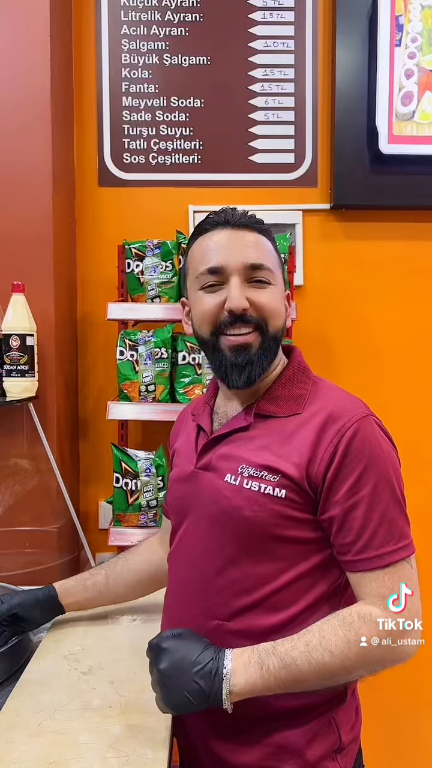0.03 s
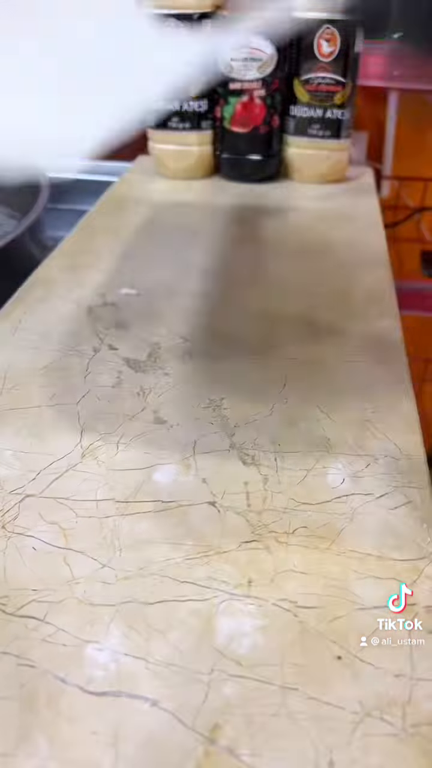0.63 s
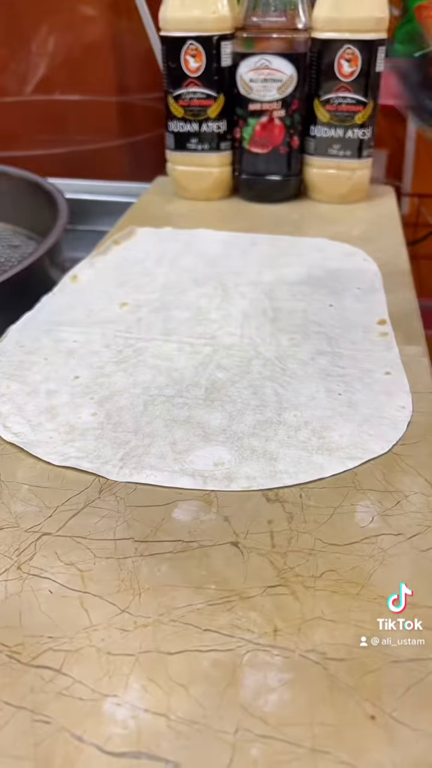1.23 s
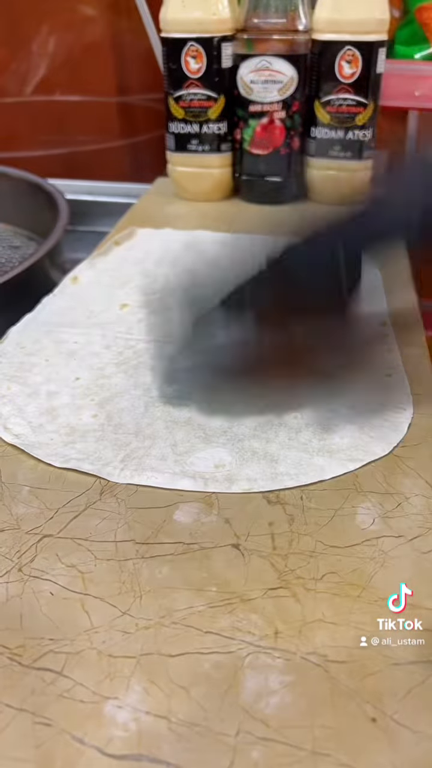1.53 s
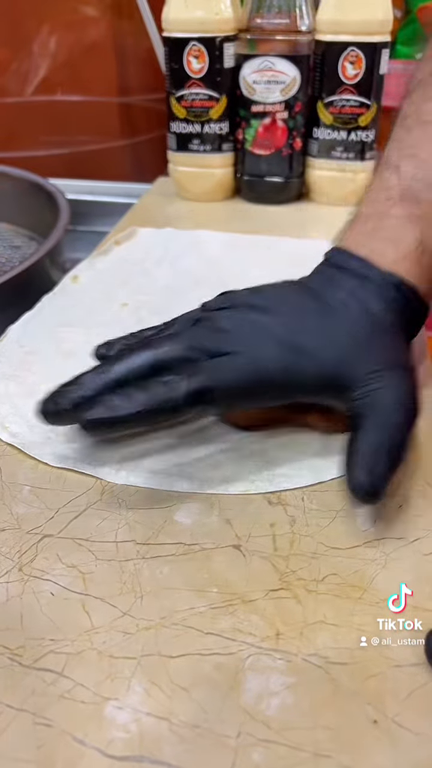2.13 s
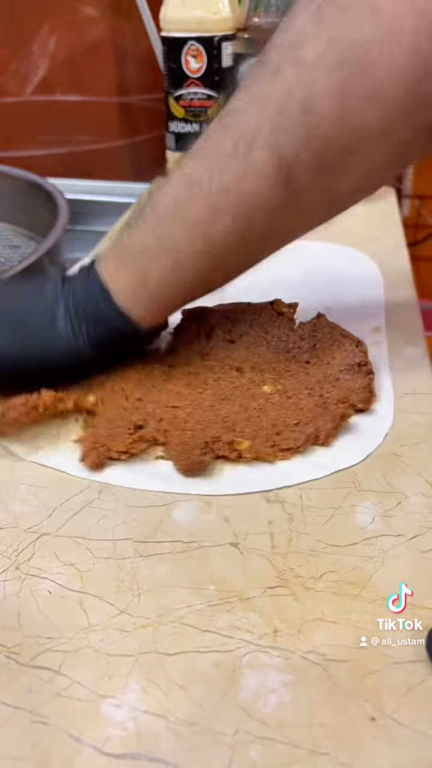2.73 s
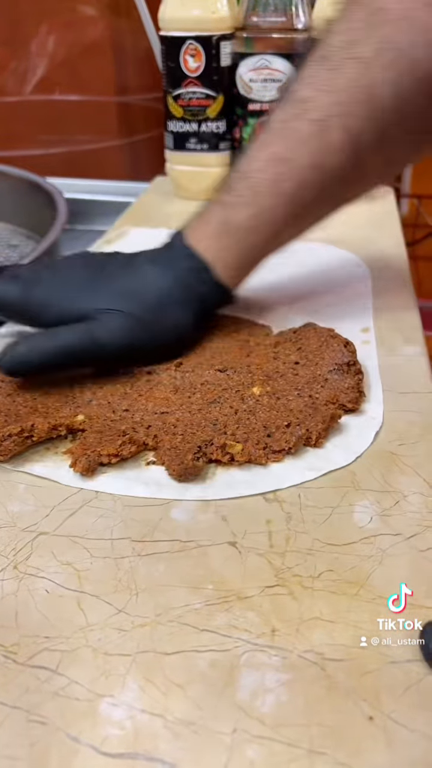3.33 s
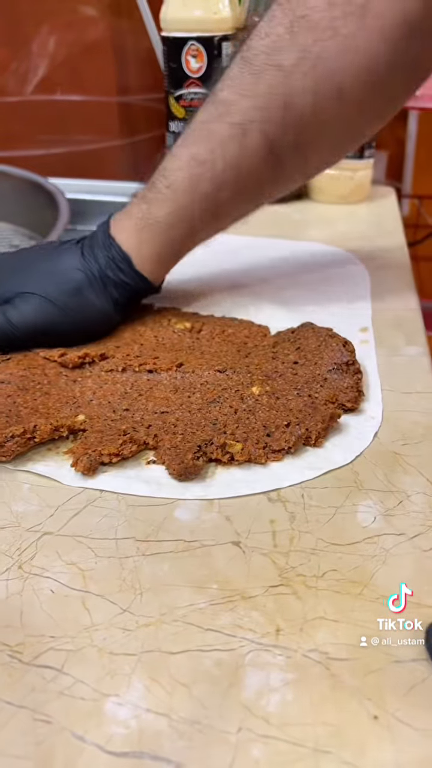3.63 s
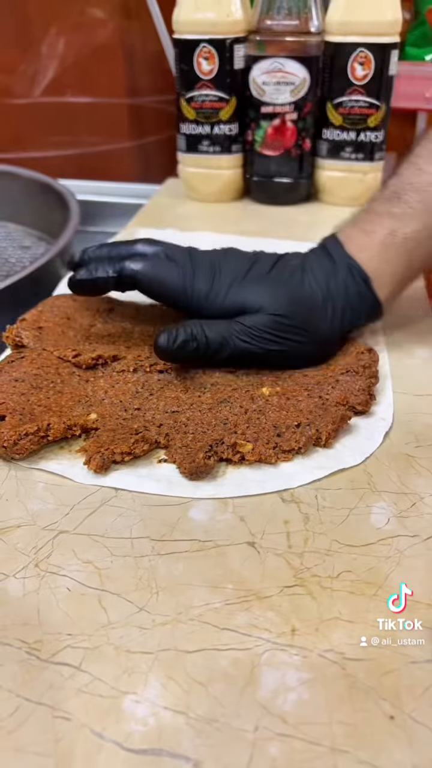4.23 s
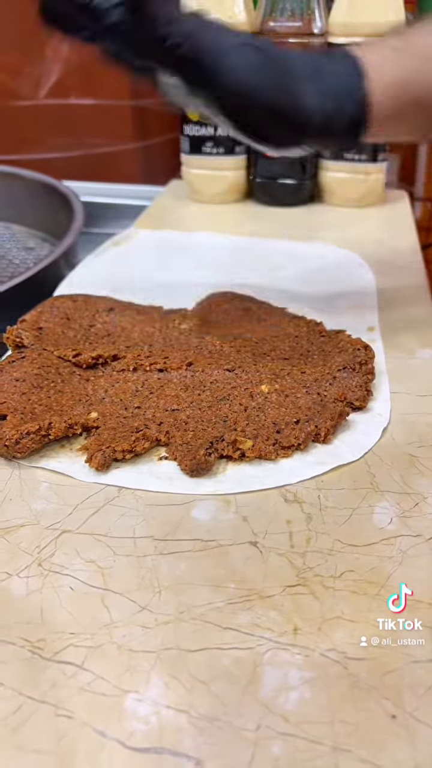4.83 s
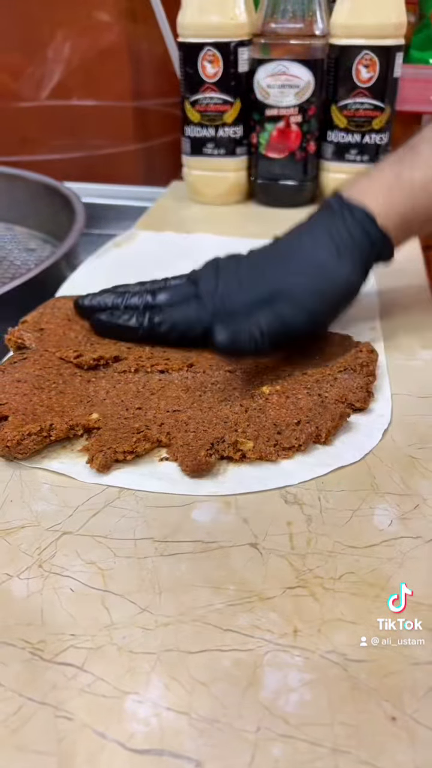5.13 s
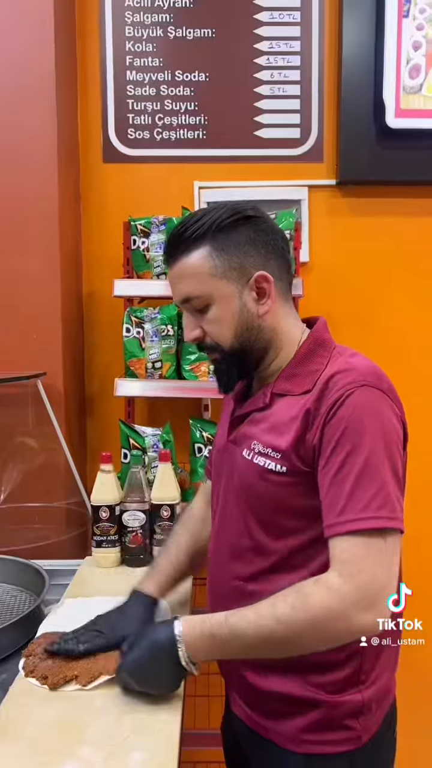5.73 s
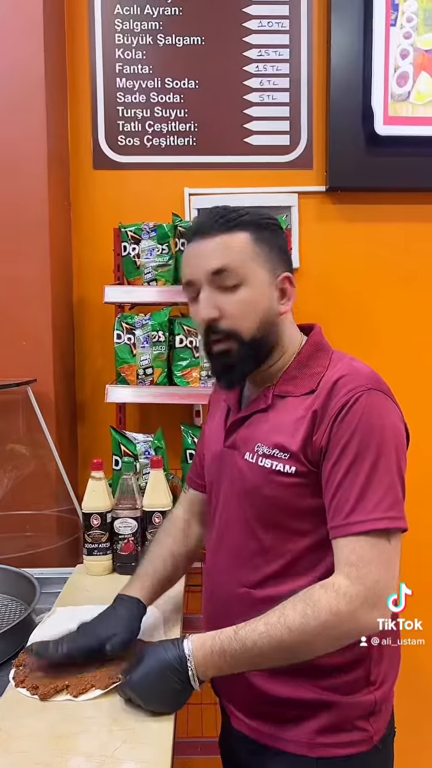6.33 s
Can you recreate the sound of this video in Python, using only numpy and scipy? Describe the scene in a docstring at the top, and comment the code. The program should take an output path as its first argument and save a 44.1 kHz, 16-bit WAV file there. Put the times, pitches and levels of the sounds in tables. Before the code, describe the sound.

Wet slaps, low counter thumps and sticky smears as gloved hands spread paste over flatbread, with coolers humming in a hard-walled shop.

```python
"""A dull rush with a thin ring stops dead; then come wet slaps, low thumps and sticky smears in a shop.
Gloved hands drop a flatbread on a stone counter, slap moist paste on it, then pat and smear it flat.
Every blow cracks, squashes the paste and thumps the counter; the hard-walled shop rings on after it.
Air pockets pop, the glove peels away, and coolers hum underneath. The treble dips once early on.
A moment after the hardest slap all sound drops out briefly, and a soft room ring returns after it."""
import sys
import numpy as np
from scipy import signal
from scipy.fft import rfft, irfft, next_fast_len
from scipy.io import wavfile
from scipy.ndimage import map_coordinates

SR = 44100
rng = np.random.default_rng(int(sys.argv[2]) if len(sys.argv) > 2 else 0)


def wrap_up_sound(samples):
    """Save the sound to the file named by the first command line argument, as 16-bit audio."""
    columns = np.atleast_2d(samples).T
    # keep every value between -1 and 1, then stretch to whole-number steps
    tamed = np.clip(columns, -1, 1)
    steps = np.round(tamed * 32767).astype(np.int16)
    wavfile.write(sys.argv[1], SR, steps)


N = 285768
T = np.arange(N) / SR

# Tone of the coolers' rumble. Each row: frequency in Hz, relative level in dB.
COOLER_COLOUR = [(15, -69), (25, -14), (45, -1), (82, 2), (127, -14.5), (195, -6.5), (416, -12.5),
                 (463, -11), (754, -16.5), (818, -15.5), (911, -21.5), (7510, -41), (11600, -39.5),
                 (16000, -49.5)]
# Tone of the shop's reverb. Each row: frequency in Hz, relative level in dB.
ROOM_COLOUR = [(80, -16), (170, -1.5), (270, 0.5), (400, -3), (500, -5), (730, -0.5), (1010, -8.5),
               (1600, -6), (2300, -7), (3400, -9), (4300, -12), (5600, -14), (7500, -12.5), (11000, -17),
               (16000, -28.5)]
# How long the shop rings. Each row: frequency in Hz, time to fall 60 dB in seconds.
ROOM_T60 = [(100, 0.42), (400, 1.205), (1200, 1.235), (2300, 1.46), (4200, 1.27), (5350, 1.18), (6300, 1.1),
            (8000, .9), (11000, .75), (16000, .55)]
# Narrow resonances in the reverb. Each row: centre in Hz, width in Hz, boost in dB.
ROOM_PEAKS = [(240, 23, 6.5), (298, 20, 7.5), (487, 22, 11), (700, 40, 5.5), (1582, 14, 4), (2075, 45, 7),
              (2360, 45, 7.5), (2480, 50, 4), (3390, 120, 3), (5280, 240, 5.5)]
# Tone of the opening rush. Each row: frequency in Hz, relative level in dB.
RUSH_TONE = [(30, -16), (55, -3), (140, -1), (200, -8), (280, -1.5), (350, -6.5), (430, -4.5), (720, -2.5),
             (1000, -1), (1250, -10), (1650, -18.5), (3500, -34), (4500, -35), (15000, -55)]
# Narrow peaks in the rush. Each row: centre in Hz, width in Hz, boost in dB.
RUSH_RESONANCES = [(152, 9, 5.5), (242, 36, 9.5), (297, 6, 7), (438, 22, 9), (553, 9, 9), (646, 10, 4),
                   (890, 42, 4.5), (1003, 10, 7)]
# The thin ring over the rush. Each row: centre in Hz, width in Hz, relative level in dB.
RING_MODES = [(1570, 180, -12), (1940, 96, -2), (2670, 250, -6.5), (3554, 106, 3)]
# Tone of paste rubbed under the palm. Each row: frequency in Hz, relative level in dB.
RUB_COLOUR = [(400, -22), (700, -16), (1150, -20), (1600, -4.5), (2150, -8.5), (3400, -7.5), (5000, -11),
              (8000, -28.5)]
# Tone of the glove's hiss. Each row: frequency in Hz, relative level in dB.
GLOVE_COLOUR = [(2350, -31.5), (4000, -13.5), (6360, -5.5), (8450, -11), (9280, -8), (11400, -12.5),
                (14200, -9.5), (16000, -21.5)]
# Smearing strokes. Each row: start in seconds, length in seconds, paste level in dB,
# glove hiss level in dB, mid-stroke pitch of the air pocket in Hz.
SMEAR_STROKES = [(1.98, .78, -62, -55.3, 2050), (3.0, .68, -53.5, -55.3, 2400), (4.02, .66, -57, -62, 2500),
                 (6.06, .42, -57, -59.5, 1750)]
# Wet ring of the peeling paste. Each row: centre in Hz, width in Hz, relative level in dB.
PASTE_MODES = [(1496, 430, -6.5), (2263, 210, -2.5), (3540, 155, -0.5), (6600, 1900, -12),
               (12500, 3600, -17)]
# The glove peels off the paste. Each row: centre time in seconds, level in dB,
# half length in seconds, brightness in dB per octave.
GLOVE_PEELS = [(1.322, -61.5, .01, 8), (1.518, -51, .011, 4), (1.718, -41.5, .013, 2.5),
               (1.752, -44, .007, 3), (2.748, -43, .032, 2), (3.515, -47.5, .021, -8.5),
               (3.792, -42.5, .035, 0), (3.848, -41.5, .014, -7), (4.652, -46.5, .029, .3)]
# Air pockets popping in the paste. Each row: start in seconds, level in dB, pitch in Hz.
AIR_POPS = [(1.967, -38.5, 3900), (2.654, -47, 2150), (2.739, -34.5, 2400), (2.859, -45, 1500),
            (3.001, -42, 3900), (3.011, -42, 1700), (3.436, -44, 1100), (3.806, -31.5, 1850),
            (4.103, -30.5, 2000)]
# Boom of the counter's cabinet. Each row: centre in Hz, width in Hz, relative level in dB.
CABINET_MODES = [(56, 6.1, 5), (90.2, 13.3, 6), (133, 20, -2.5), (230, 30, -8), (332, 25, -10.5),
                 (470, 110, -16)]
# Low thumps of the counter. Each row: start in seconds, flex level in dB, pitch in Hz,
# overtone in dB relative to the flex, boom level in dB.
COUNTER_THUMPS = [(0.792, -31, 63, -15, -35.5), (1.546, -20.5, 57, -1, -28), (1.916, -38, 55, -20, -37.5),
                  (3.06, -46, 70, -14, -47), (3.5, -30, 125, -18, -38.5), (3.775, -36, 71, -14, -35.5),
                  (3.828, -30.5, 123, -28, -45), (4.09, -29.5, 55, -8, -32.5), (4.934, -25, 57, 5.5, -25),
                  (5.8, -47, 60, -8, -48), (6.104, -38, 72, 4, -37), (6.34, -50, 90, -3, -45),
                  (6.456, -34.5, 93, -14, -50)]
# Tone of a slap's crack. Each row: frequency in Hz, relative level in dB.
CRACK_COLOUR = [(100, -12.5), (300, -5.5), (600, 7), (850, -0.5), (1080, -12.5), (1500, 3), (2600, -2),
                (4100, -1), (7200, -2.5), (9000, -11.5), (12000, -20.5), (16000, -37.5)]
# Tone of squashed paste. Each row: frequency in Hz, relative level in dB.
SQUASH_COLOUR = [(80, -2), (250, 0), (600, -5), (850, -1), (1060, -8), (1400, -5), (2400, -8.5), (4000, -7),
                 (7000, -10.5), (11000, -14.5), (16000, -19)]
# Slaps and pats, except at 5.797 s: that row is the soft room ring returning as the silence ends.
# Each row: start in seconds, crack level in dB, squash level in dB, squash's 60 dB decay
# in seconds, palm lag in seconds, lower and upper hollow band in Hz, their boost in dB,
# brightness in dB per octave, reverb level in dB.
SLAPS_AND_ROOM_RING = [(0.7745, -24.5, -27, .14, .018, 850, 1850, 7, -.3, -45),
                       (1.5395, -15, -18.5, .087, .013, 1900, 7000, 3.5, 1.1, -35),
                       (1.913, -28.5, -29, .055, .006, 750, 1750, 4, -2.2, -49),
                       (4.0805, -39, -36.5, .13, .023, 530, 1700, 5.5, 0, -44.5),
                       (4.927, -8.3, -20.5, .06, .015, 490, 5200, 2.2, 1.9, -23),
                       (5.797, -63, -48.5, .13, .015, 350, 1400, 5, -3.2, -50),
                       (6.0945, -44, -27.5, .11, .013, 1600, 3380, 7.5, .5, -40.5),
                       (6.448, -34.5, -29.5, .16, .014, 1190, 2300, 8, -1.3, -45)]
# A brief dip in the treble. Each row: time in seconds, treble gain in dB.
TREBLE_DIP = [(1.073, -0.5), (1.079, -10), (1.15, -8), (1.2, -1)]


def amp(db):
    """Decibels to gain."""
    return 10 ** (np.asarray(db) / 20)


def unit(x):
    """Scale to rms 1."""
    return x / np.sqrt(np.mean(x ** 2) + 1e-20)


def along(points, hz):
    """Read (Hz, value) points on a log frequency axis."""
    f, v = np.transpose(points)
    return np.interp(np.log(hz + 1), np.log(f + 1), v)


def wobble(rate):
    """A smooth random curve, rate knots a second."""
    return map_coordinates(rng.standard_normal(8192), [T * rate], mode="wrap")


def filtered(x, response):
    """Equalise x with a gain given as a function of frequency."""
    size = next_fast_len(len(x) + 8192)
    return irfft(rfft(x, size) * response(np.fft.rfftfreq(size, 1 / SR)), size)[:len(x)]


def noise(response, size=N):
    """Coloured noise of rms 1."""
    return unit(filtered(rng.standard_normal(size), response))


def crackle(size, spread_db):
    """Dense tiny snaps of uneven size."""
    return rng.standard_normal(size) * amp(spread_db * np.minimum(rng.exponential(size=size), 4))


def resonances(modes, f):
    """A bank of (Hz, width, dB) band-pass resonators of alternating polarity."""
    return sum((-1) ** k * amp(db) * 1j * f * width / (hz * hz - f * f + 1j * f * width)
               for k, (hz, width, db) in enumerate(modes))


def boosts(peaks, f):
    """Gain of (Hz, width, dB) bell boosts on a flat response."""
    return amp(sum(db / (1 + (2 * (f - hz) / width) ** 2) for hz, width, db in peaks))


def tilt(f, slope_db):
    """A slope in dB per octave above the bass."""
    return amp(slope_db * np.log2(1 + f / 400))


def attack(t, rise):
    """A rounded onset with a time constant of rise seconds."""
    return 1 - np.exp(-t / rise)


def fade(t, t60):
    """Decay by 60 dB in t60 seconds."""
    return np.exp(-np.log(1000) * t / t60)


def add(track, start, sound):
    """Mix a sound into the track from start seconds."""
    part = track[round(start * SR):][:len(sound)]
    part += sound[:len(part)]


def coolers(rumble_db=-56, hum_hz=95, hum_db=-66):
    """The bed: coolers rumble under a soft, wavering hum."""
    hum = amp(hum_db + 2 * wobble(10)) * np.sin(2 * np.pi * hum_hz * T + wobble(2))
    return amp(rumble_db) * noise(lambda f: amp(along(COOLER_COLOUR, f))) + hum


def room_tail(source_colour, predelay=.01):
    """The shop's answer to a hit: it starts after the trip to the walls, and the highs die early."""
    wash = noise(lambda f: amp(along(ROOM_COLOUR, f)) * boosts(ROOM_PEAKS, f) * source_colour(f), SR)
    hz, times, spectrum = signal.stft(wash, SR, nperseg=256)
    decay = fade(times, along(ROOM_T60, hz)[:, None])
    tail = signal.istft(spectrum * decay, SR, nperseg=256)[1][:SR]
    return tail * np.clip((T[:SR] - predelay) / .002, 0, 1)


def opening_rush(end_s=.603, rush_db=-29.2, ring_db=-36.5, flutter_db=1.9):
    """A dull, fluttering rush with one tick and a thin ring that fades faster; all stop dead."""
    dull = lambda: noise(lambda f: amp(along(RUSH_TONE, f)) * boosts(RUSH_RESONANCES, f))
    rush = amp(rush_db - 12.5 * T + flutter_db * wobble(40)) * dull()  # falls 12.5 dB a second
    thin = noise(lambda f: resonances(RING_MODES, f) / (1 + (f / 4200) ** 8))
    ring = amp(ring_db - 52 * T) * thin
    tick = amp(-18) * fade(T, t60=.02) * attack(T, rise=.001) * dull()
    add(rush, start=.22, sound=tick)
    return (rush + ring) * np.clip((end_s - T) / .002, 0, 1)


def smearing(stick_db=1.1, ease_db=11, pocket_rise_octaves=.5, flutter_hz=280, rustle_db=-69.5):
    """The palm sticks and slips over grainy paste; the glove hisses and the counter rumbles."""
    grip_db = stick_db * wobble(45)
    grains = lambda colour: unit(filtered(crackle(N, spread_db=3.5), lambda f: amp(along(colour, f))))
    rub = grains(RUB_COLOUR)
    rumble = amp(-3) * noise(lambda f: resonances(CABINET_MODES, f))
    paste = rub + rumble
    hiss = grains(GLOVE_COLOUR)
    flutter = noise(lambda f: 1 / (1 + (f / flutter_hz) ** 2))
    # The gloves rustle faintly from 1 s on and are sticky with paste from 1.55 s.
    since = lambda start: np.clip((T - start) / .2, 0, 1)
    out = amp(rustle_db + grip_db) * (since(1.0) * hiss + amp(3) * since(1.55) * paste)
    for start, length, paste_db, hiss_db, pocket_hz in SMEAR_STROKES:
        progress = np.clip((T - start) / length, 0, 1) - .5  # zero at mid-stroke
        swell = np.abs(np.cos(np.pi * progress)) ** 1.5  # the hand speeds up, then slows
        pitch = pocket_hz * 2 ** (pocket_rise_octaves * progress)  # the air pocket shrinks
        pocket = amp(-1) * unit(flutter * np.sin(2 * np.pi * np.cumsum(pitch) / SR))
        pressure = amp(paste_db + grip_db - ease_db * progress)
        out += swell * (pressure * (paste + pocket) + amp(hiss_db + grip_db / 2) * hiss)
    return out


def peels(patches=5, pitch_spread=.11, scatter=.4, lead_s=.25):
    """Sticky threads snap in a quick swell as the glove lifts; each patch rings at its own pitch."""
    out, size = np.zeros(N), SR // 2
    t = T[:size] - lead_s
    spread = np.linspace(-1, 1, patches)
    for centre, db, half_length, bright_db in GLOVE_PEELS:
        swell = amp(db) / np.sqrt(patches) / (1 + np.abs(t / half_length) ** 3)
        for offset, detune in zip(spread, rng.permutation(spread)):
            stretch = np.exp(pitch_spread * detune)
            snaps = crackle(size, spread_db=3.5)
            wet = filtered(snaps, lambda f: resonances(PASTE_MODES, f * stretch) * tilt(f, bright_db))
            add(out, centre + offset * scatter * half_length - lead_s, swell * unit(wet))
    return out


def pops(pocket_width=.5, pocket_db=12.5, bright_db=-.3, room_db=-23):
    """Trapped air bursts from the paste: a short squelch tuned by its pocket, with a touch of room."""
    out, t = np.zeros(N), T[:SR]
    envelope = fade(t, t60=.085) * attack(t, rise=.0015)
    for start, db, hz in AIR_POPS:
        pocket = lambda f: boosts([(hz, hz * pocket_width, pocket_db)], f) * tilt(f, bright_db)
        squelch = envelope * noise(lambda f: amp(along(SQUASH_COLOUR, f)) * pocket(f), SR)
        add(out, start, amp(db) * (squelch + amp(room_db) * room_tail(pocket)))
    return out


def thumps(ring_cycles=27, overtone_ratio=2.08):
    """The low end: the counter top flexes at a pitch set by where it is hit, and its cabinet booms."""
    out, t = np.zeros(N), T[:SR]
    mode = lambda hz: -np.sin(2 * np.pi * hz * t) * fade(t, ring_cycles / hz)
    for start, db, hz, overtone_db, boom_db in COUNTER_THUMPS:
        flex = amp(db) * (mode(hz) + amp(overtone_db) * mode(hz * overtone_ratio))
        boom = amp(boom_db) * noise(lambda f: resonances(CABINET_MODES, f), SR) * fade(t, t60=.66)
        add(out, start, (flex + boom) * attack(t, rise=.0017))
    return out


def slaps(contact_s=.0034, knock_hz=325, knock_db=-9, palm_db=-3):
    """Air cracks from under fingers, then palm; the paste squashes, the stone knocks, the room rings.
    With almost no crack, the same layers give the soft room ring that returns as the silence ends."""
    out, t = np.zeros(N), T[:SR]
    burst = attack(t, rise=.00026) * np.exp(-(t / contact_s) ** 4)
    knock = -amp(knock_db) * np.sin(2 * np.pi * knock_hz * t) * fade(t, t60=.045) * attack(t, rise=.002)
    for (start, crack_db, squash_db, squash_t60, palm_lag,
         low_hz, high_hz, hollow_db, bright_db, room_db) in SLAPS_AND_ROOM_RING:
        # The hollow under the hand favours two bands, whose narrow centres linger in the room.
        bands = lambda f, width, db: boosts([(hz, hz * width, db) for hz in (low_hz, high_hz)], f)
        hollow = lambda f: bands(f, width=.41, db=hollow_db)
        lingering = lambda f: np.sqrt(hollow(f)) * bands(f, width=.33, db=4.5) * tilt(f, bright_db / 2)
        shaped = lambda colour: noise(
            lambda f: amp(along(colour, f)) * hollow(f) * tilt(f, bright_db), SR)
        crack = lambda: burst * unit(np.tanh(shaped(CRACK_COLOUR) / 2))  # saturated for a dense snap
        squash = amp(squash_db) * fade(t, squash_t60) * attack(t, rise=.003) * shaped(SQUASH_COLOUR)
        room = amp(room_db) * room_tail(lingering)
        fingers = amp(crack_db) * (crack() + knock)
        palm = amp(squash_db + palm_db) * crack()
        add(out, start, fingers + squash + room)
        add(out, start + palm_lag, palm)
    return out


def scene():
    """Mix the hand work, the opening rush and the cooler bed in mono."""
    return (slaps() + thumps() + pops() + peels() + smearing() + opening_rush() + coolers())[None]


def record(dry, treble_hz=600, mute_start_s=5.611, mute_end_s=5.798, top_hz=16100):
    """The treble dips once, all sound drops out for a moment, and the very top is cut off."""
    dip_db = np.interp(T, *np.transpose(TREBLE_DIP))
    treble = filtered(dry[0], lambda f: f ** 2 / (f ** 2 + treble_hz ** 2))
    dipped = dry[0] + treble * (amp(dip_db) - 1)
    gate = np.clip(np.maximum(mute_start_s - T, T - mute_end_s) / .001, 0, 1)
    return filtered(dipped * gate, lambda f: f < top_hz)[None]


dry = scene()
out = record(dry)
wrap_up_sound(out)
```